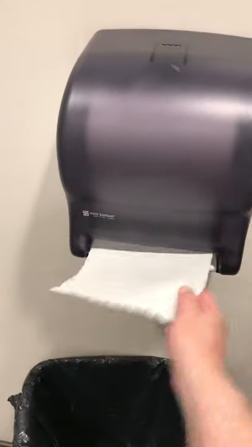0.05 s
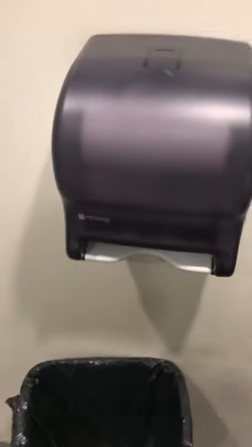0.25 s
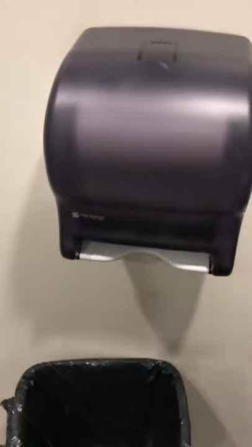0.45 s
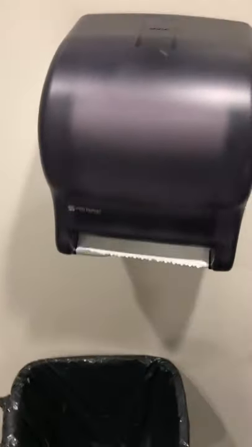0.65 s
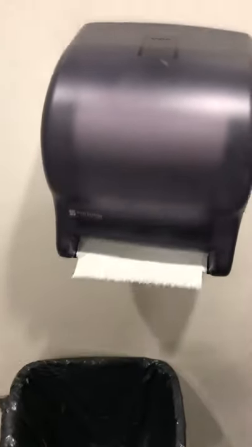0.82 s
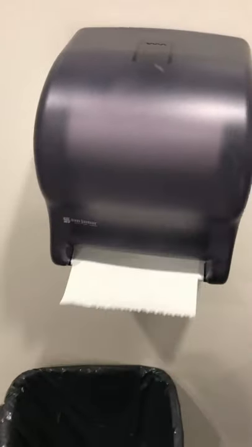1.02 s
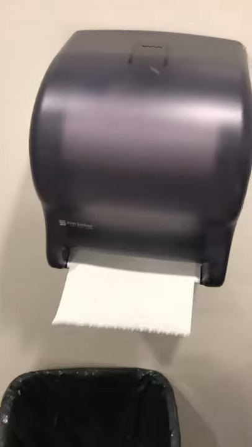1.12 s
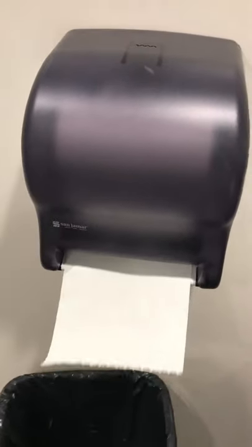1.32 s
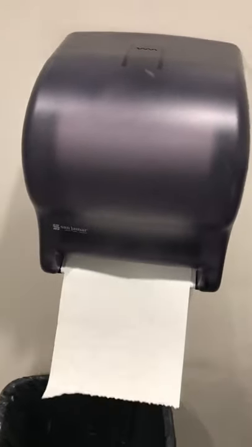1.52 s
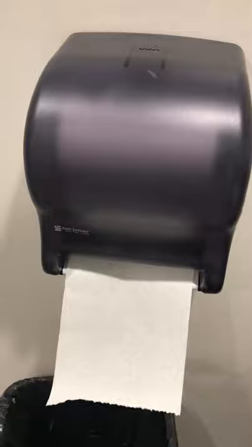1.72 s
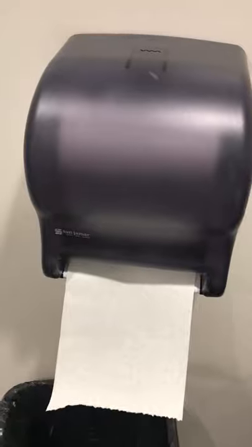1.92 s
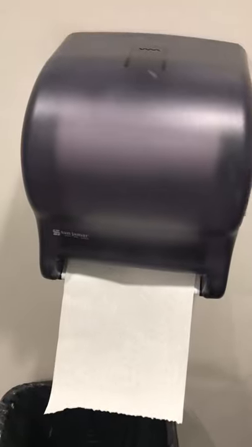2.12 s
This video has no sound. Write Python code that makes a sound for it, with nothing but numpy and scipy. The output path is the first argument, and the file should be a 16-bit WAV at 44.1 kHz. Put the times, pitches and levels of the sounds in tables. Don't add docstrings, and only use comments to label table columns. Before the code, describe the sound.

In a reverberant restroom, a towel is sharply torn off, then the dispenser's motor spins up fast, holds a wavering nasal whine for over a second and slows to a stop, with faint paper rustle.

```python
import sys
import numpy as np
from scipy import signal
from scipy.fft import rfft, irfft
from scipy.io import wavfile
from scipy.ndimage import uniform_filter1d

SR = 44100
rng = np.random.default_rng(int(sys.argv[2]) if len(sys.argv) > 2 else 0)


def dump_mix(stems):
    frames = np.atleast_2d(stems).T
    limited = np.clip(frames, -1, 1)
    pcm = np.round(limited * 32767).astype(np.int16)
    wavfile.write(sys.argv[1], SR, pcm)


def gain_from_db(level_db):
    decades = np.asarray(level_db, float) / 20
    return 10 ** decades


N = 94815
T = np.arange(N) / SR


def evened(x):
    return x / np.sqrt(np.mean(x ** 2) + 1e-20)


def read(points, hz):
    f, value = np.transpose(points)
    return np.interp(np.log(hz + 1), np.log(f + 1), value)


def colour(x, points):
    gain = gain_from_db(read(points, np.fft.rfftfreq(N, 1 / SR)))
    return evened(irfft(rfft(x) * gain, N))


def drift(per_s):
    rates = per_s * np.geomspace(.1, 1, 24)
    return evened(sum(np.sin(2 * np.pi * (f * T + rng.random())) / np.sqrt(f) for f in rates))


def resonate(x, hz, width):
    turn = np.exp(2j * np.pi * hz * np.arange(len(x)) / SR)
    r = np.exp(-np.pi * width / SR)
    return 2 * (turn * signal.lfilter([1 - r], [1, -r], x / turn)).real


def fuzz(hz, width):
    once = resonate(rng.standard_normal(N), hz, width)
    return evened(resonate(once, hz, width))


def air():
    # hz [Hz], level_db [dB]
    wash_spectrum = [(20, -17.5), (107, -10.5), (350, -5.5), (750, -9.5), (1600, -13.5), (2200, -23),
                     (6000, -34), (16000, -56.5)]
    # hz [Hz], width_hz [Hz], level_db [dB]
    duct_modes = [(63, 10.2, -56), (357, 61, -53)]
    wash = gain_from_db(-39 + 1.6 * drift(5.84)) * colour(rng.standard_normal(N), wash_spectrum)
    tone_hz, tone_db = 293.4, -46
    tone = np.sqrt(2) * gain_from_db(tone_db + 0.7 * drift(8.1)) * np.sin(2 * np.pi * tone_hz * T)
    return wash + tone + sum(gain_from_db(db) * fuzz(hz, width) for hz, width, db in duct_modes)


def early(x):
    taps = 0.055 * rng.standard_normal(700) * np.exp(-np.arange(700) / 240.0)
    taps[0] = 1
    return signal.fftconvolve(x, taps / np.linalg.norm(taps))[:N]


def tear():
    # start_s [s], effort_db [dB]
    pull_effort = [
        (.18, -38),
        (0.194, -17.5),
        (.204, -17.5),
        (0.208, -8.5),
        (0.224, -5.5),
        (0.234, 3),
        (0.253, -3),
        (.28, -5.5),
        (.33, -27),
    ]
    # hz [Hz], level_db [dB]
    fibre_spectrum = [(60, -25), (150, -7), (300, 0), (550, -5), (1500, -3), (4470, -7.5), (5200, -14),
                      (16000, -26.5)]
    # start_s [s], peak_db [dB]
    large_snaps = [
        (.207, -17.5),
        (.221, -23.5),
        (.237, -17),
        (.258, -17),
    ]
    snaps_per_s, spread_db, hiss = 7000, 2.8, 0.57
    happens = rng.random(N) < snaps_per_s / SR
    strength = gain_from_db(spread_db * np.minimum(rng.exponential(1, N), 4))
    clicks = happens * strength * rng.choice([-1., 1.], N)
    s, db = np.transpose(pull_effort)
    effort = gain_from_db(np.interp(T, s, db, -120, -120))
    drive = (evened(clicks) + hiss * rng.standard_normal(N)) * effort
    t = np.arange(200) / SR
    for at, peak_db in large_snaps:
        snap = gain_from_db(peak_db + 29 - 60 * t / 0.002) * rng.standard_normal(200)
        drive[round(at * SR):][:200] += snap
    return gain_from_db(-17 - 17) * early(colour(drive, fibre_spectrum))


def knock():
    # hz [Hz], level_db [dB], t60_s [s]
    cover_modes = [(63, -11, 0.28), (162, -7.5, 0.25), (217, 1.5, 0.14), (271, -1, 0.23), (395, 0.5, 0.13),
                   (560.6, -5.5, 0.23), (743, 0, .1), (1260, 0, 0.1), (1684, -2, 0.18)]
    start_s, rise_s, knock_db = .235, 0.017, -19
    after = np.maximum(T - start_s, 0)
    ringing = 0
    for f, db, t60 in cover_modes:
        fade = gain_from_db(db - 60 * after / t60 + 2.3 * drift(58.0))
        ringing = ringing + fade * np.sin(2 * np.pi * (f * after + rng.random()))
    ringing = ringing / gain_from_db(max(mode[1] for mode in cover_modes))
    return gain_from_db(knock_db) * np.minimum(after / rise_s, 1) * ringing


def rustles():
    # start_s [s], length_s [s], hz [Hz], width_hz [Hz], level_db [dB]
    swells = [
        (0.61, 0.11, 15100, 500, -63),
        (1.03, .1, 15200, 616, -60),
        (1.644, 0.22, 15400, 500, -59),
        (1.66, 0.13, 8500, 890, -51.5),
        (1.693, 0.21, 7700, 900, -52.5),
        (1.9, 0.085, 9100, 9000, -52),
        (2.043, .12, 5000, 9000, -57),
        (0.213, .012, 15000, 2520, -46),
    ]
    # hz [Hz], density_db [dB per Hz]
    sheet_spectrum = [(1500, 4), (3000, 3.5), (6000, -1), (10000, -11.5), (16000, -16)]
    paper = colour(rng.standard_normal(N), [(300, -58)] + sheet_spectrum)
    out = gain_from_db(-49 + 1.38 * drift(25.3)) * (T > 0.24) * paper
    for s, length, hz, width, db in swells:
        swell = np.sin(np.pi * np.clip((T - s) / length, 0, 1) ** .5) ** 2
        out += gain_from_db(db) * fuzz(hz, width) * swell
    return out


def motor():
    # start_s [s], tooth_rate_hz [Hz], load_db [dB]
    mesh_course = [(.335, 550, -25), (.352, 790.4, -7), (.372, 1052, -4), (.39, 1191, -1.5),
                   (0.522, 1153, 1.5), (0.619, 1163, -3), (.72, 1148, 1.5), (0.999, 1132, -2),
                   (1.029, 1137, -8.5), (1.14, 1152, 2.5), (1.238, 1131, -12.5), (1.309, 1129, 3.5),
                   (1.379, 1138, -10.5), (1.47, 1146, 4.5), (1.556, 1118, -2.5), (1.62, 798, -14.5),
                   (1.715, 384.7, -11), (1.779, 300.3, -29)]
    # multiple [of tooth rate], level_db [dB], waver_db [dB], pitch_wobble [0-1]
    mesh_tones = [(1, -21, 2, 0.01), (.945, -39, 8.5, 0), (1.075, -42, 4, 0), (1.26, -42.5, 5, 0.04),
                  (1.99, -44.5, 0, .035), (2.98, -46, 3.5, 0.02), (3.97, -53.5, -2.5, 0.02)]
    # multiple [of shaft rate], level_db [dB], waver_db [dB]
    shaft_orders = [(3.986, -40.5, 1.3), (5.982, -47.5, 1.5), (8.98, -47, 2.0), (12.01, -44.5, 1.6),
                    (13.83, -49, 6), (14.886, -28.5, 1.1), (20.1, -45, 4), (28.34, -53, 6)]
    # hz [Hz], level_db [dB]
    brush_spectrum = [(59, -60), (110, -24), (283, -17.5), (490, -29), (800, -14), (1310, -16), (3470, -20),
                      (16000, -50.5)]
    # hz [Hz], width_hz [Hz], level_db [dB]
    housing_modes = [(1468, 380, -36), (2269, 240, -39.5), (3285, 380, -42.5), (4435, 370, -48),
                     (5640, 1800, -45.5)]
    shaft_hz, run_hz = 70.9, 1144.5
    s, hz, load_db = np.transpose(mesh_course)
    on = (T > s[0]) * (T < s[-1])
    rate, load = np.interp(T, s, hz), gain_from_db(np.interp(T, s, load_db))
    speed = np.minimum(uniform_filter1d(rate, 2000) / run_hz, 1) * on

    slack_wobble, slack_db = 0.0753, -27.5
    slack = np.clip(.96 - rate / run_hz, 0, 1) * on
    judder = gain_from_db(slack_db + 2.1 * drift(60.)) * np.sqrt(slack) * speed
    out = judder * (fuzz(1560, 390) + fuzz(857, 340))

    for k, db, waver_db, wobble in mesh_tones:
        wander = (wobble + slack_wobble * slack) * drift(40)
        turns = np.cumsum(rate * (1 + wander)) / SR
        push = load if k == 1 else np.sqrt(load) * speed
        level = np.sqrt(2) * gain_from_db(db + waver_db * drift(50)) * push * on
        out += level * np.sin(2 * np.pi * k * turns)

    shaft = np.cumsum(shaft_hz * np.minimum(speed * 1.03, 1)) / SR
    for k, db, waver_db in shaft_orders:
        level = np.sqrt(2) * gain_from_db(db + waver_db * drift(35.17)) * speed ** 2
        out += level * np.sin(2 * np.pi * (k * shaft + rng.random()))

    contact = 1 + 0.14 * (np.cos(2 * np.pi * shaft) + np.cos(4 * np.pi * shaft))
    brushes = rng.standard_normal(N) * contact * gain_from_db(0.53 * drift(60.))
    whirr = gain_from_db(-31.5) * colour(brushes, brush_spectrum)
    rattle = sum(gain_from_db(db + 2.6 * drift(50.)) * fuzz(f, w) for f, w, db in housing_modes)
    return out + speed ** 1.54 * (whirr + rattle)


def thud():
    start_s, length_s, hz, level_db = 1, 0.077, 70, -44
    bump = np.sin(np.pi * np.clip((T - start_s) / length_s, 0, 1))
    return gain_from_db(level_db) * bump * np.sin(2 * np.pi * hz * T)


def room(x):
    # hz [Hz], t60_s [s]
    tile_decay = [(150, 0.99), (500, 1), (1200, 1.56), (3000, 0.94), (8000, .6), (15000, 0.3)]
    taps, at = np.zeros(SR * 2), np.arange(300, SR * 2 - 20, 20)
    taps[at + rng.integers(0, 20, at.shape)] = rng.choice([-1., 1.], at.shape)
    hz, t, z = signal.stft(taps, SR, nperseg=256)
    fade = gain_from_db(-60 * t / read(tile_decay, hz)[:, None])
    tail = signal.istft(z * fade, SR, nperseg=256)[1]
    return signal.fftconvolve(x, tail / np.linalg.norm(tail))[:N]


def scene():
    whine = motor()
    rip = tear() + knock()
    ring_hz, ring_t60_s, ring_db = 1146, 2, 1
    whine = whine + gain_from_db(ring_db) * resonate(whine, ring_hz, 1.7 / ring_t60_s)
    reverb = room(gain_from_db(-8) * whine + gain_from_db(-5.5) * rip)
    return (whine + rip + rustles() + thud() + reverb + air())[None]


def band_limit(x):
    return signal.sosfilt(signal.butter(12, 16490, fs=SR, output="sos"), x)


def record(dry):
    edge = signal.firwin(1023, 15740, window=("kaiser", 9), fs=SR)
    mix = signal.oaconvolve(dry, edge[None], "same")
    return band_limit(mix)


dry = scene()
out = record(dry)
dump_mix(out)
```